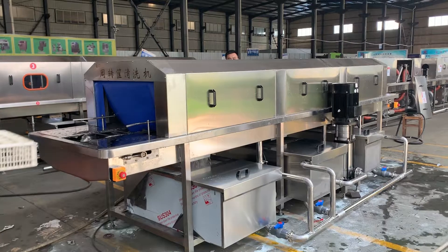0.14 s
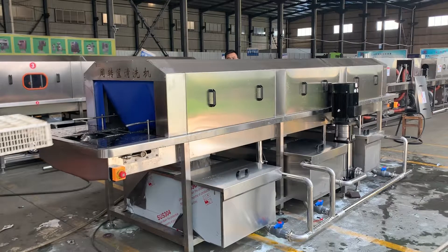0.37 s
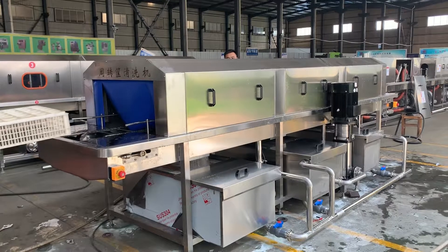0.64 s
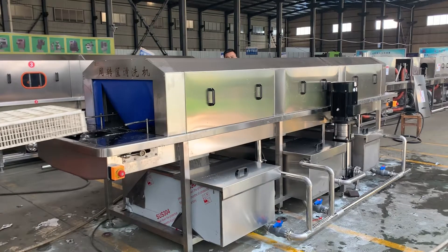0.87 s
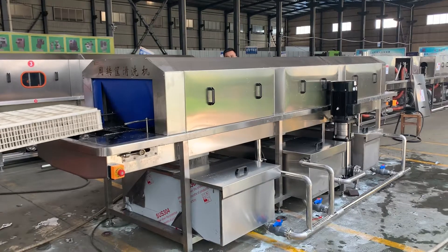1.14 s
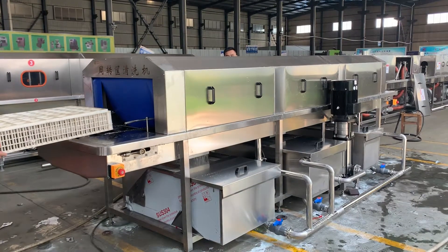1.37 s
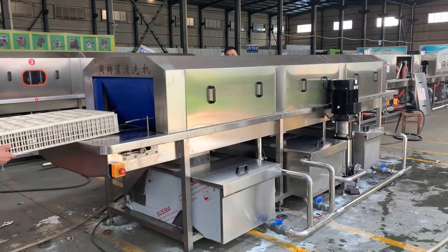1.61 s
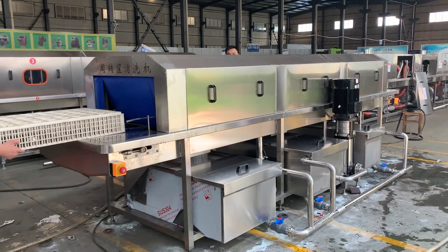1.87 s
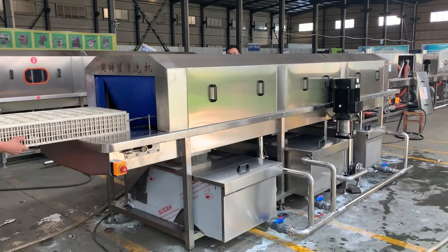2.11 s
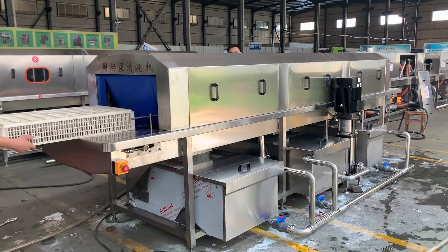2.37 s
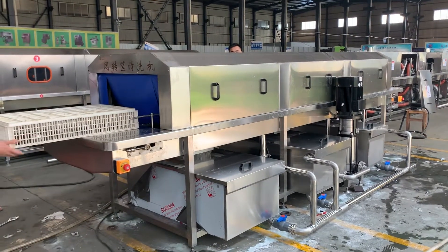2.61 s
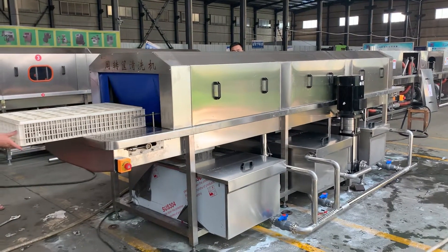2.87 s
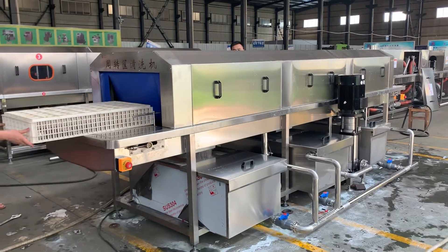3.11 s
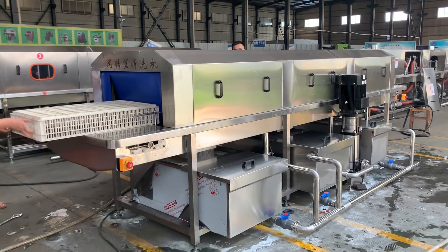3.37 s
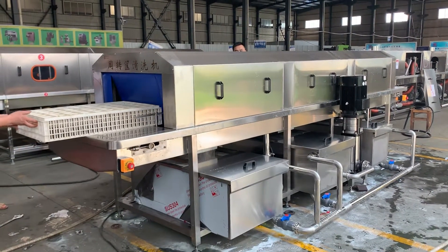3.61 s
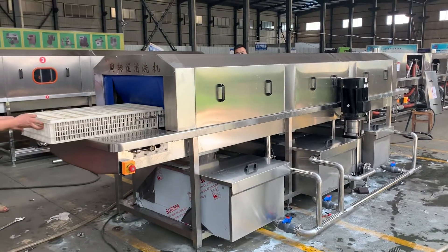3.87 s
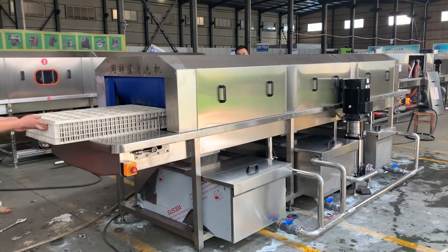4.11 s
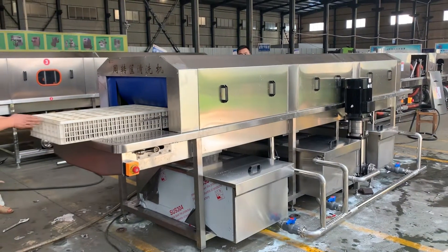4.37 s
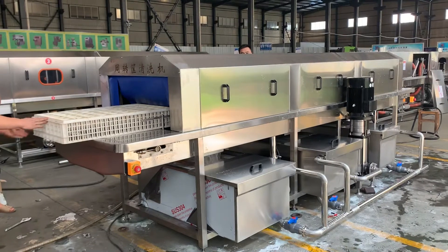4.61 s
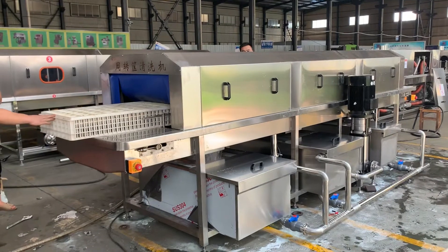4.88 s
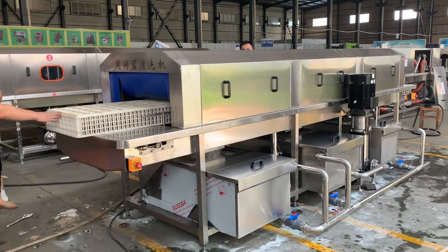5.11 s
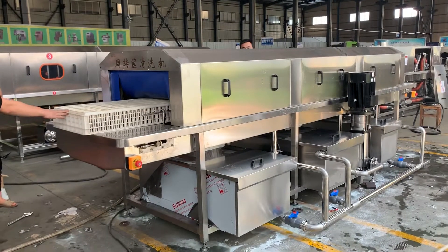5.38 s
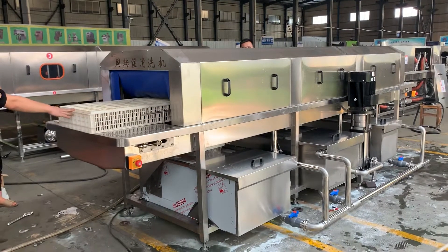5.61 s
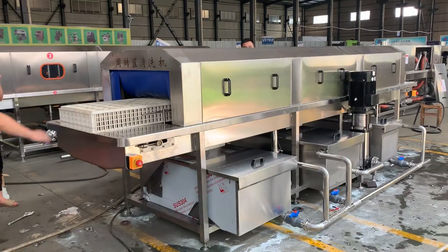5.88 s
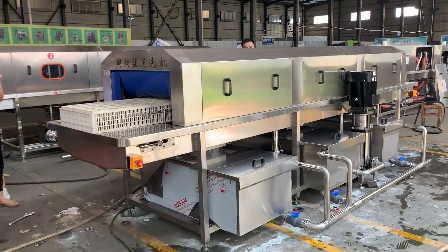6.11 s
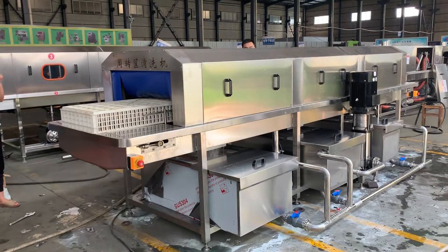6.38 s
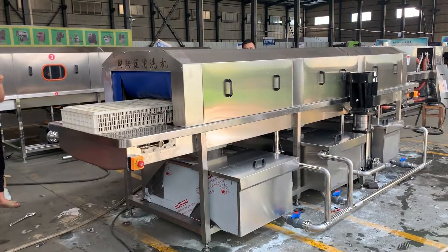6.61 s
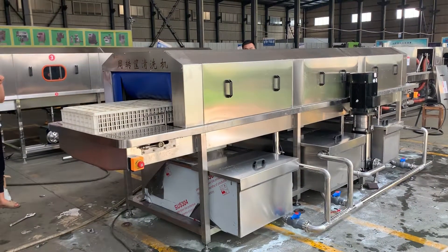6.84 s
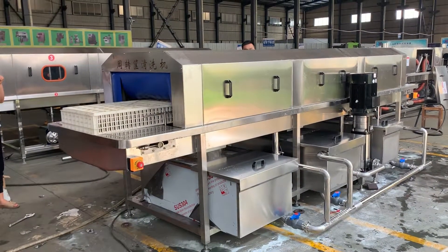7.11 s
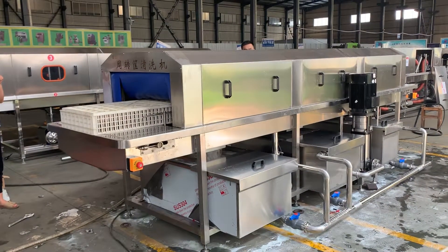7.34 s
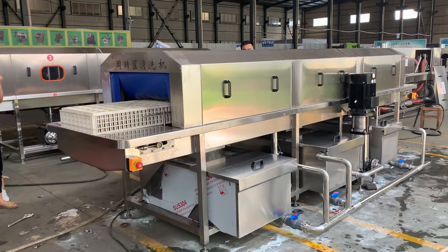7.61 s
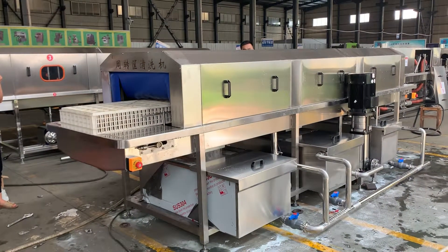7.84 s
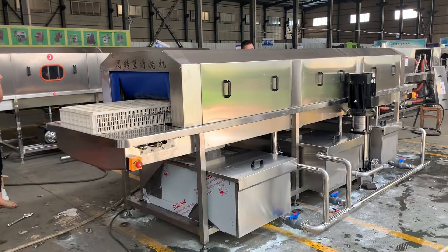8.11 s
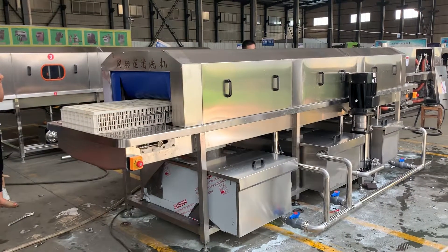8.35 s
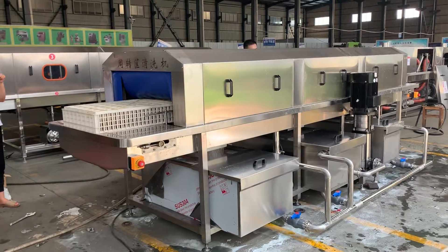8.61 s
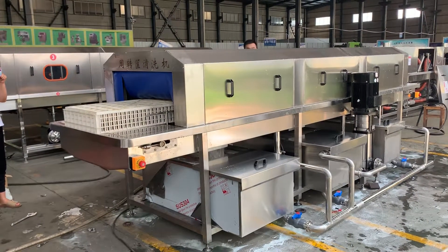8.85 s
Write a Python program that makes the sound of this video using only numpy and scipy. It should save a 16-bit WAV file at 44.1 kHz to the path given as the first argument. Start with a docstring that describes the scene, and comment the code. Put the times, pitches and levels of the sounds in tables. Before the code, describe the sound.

For about nine seconds a large steel washing machine runs continuously in a reverberant factory hall. A low pump hum, one deep tone near 50 Hz and another near 245 Hz, holds steady pitch while its level drifts; the upper tone is strongest around 2.4 s and weaker later. Water jets rush inside as broad midrange noise, with soft surges near 0.8, 2.7, 4.7 and 8.4 s. Panels and lids drone hollowly, the lids swelling slightly, above low hall rumble. Close and dry, slightly right, a bright spray hisses: strong at the start, dropping by 0.35 s, spurting rapidly from 0.9 to 2.6 s, fuller around 3 s, then sputtering irregularly, with noticeable bursts near 4.8, 5.4 and 6.6 s, and rising again towards the end. Stereo microphones a few metres away; nothing stops.

```python
"""In a factory hall a tunnel washer runs. Its pump hums at shaft speed and at the five-vane rate: steady sines
with slowly wavering level and phase. Water jets wash inside and a near spray sputters: shaped noise under
level curves. Steel housing and lids drone as noise in resonant bands, over the low rumble of the hall.
Two microphone ports hear each noise source with its own delay; all but pump and spray reverberate."""
import sys
import numpy as np
from scipy import signal
from scipy.fft import rfft, irfft, next_fast_len
from scipy.io import wavfile
from scipy.ndimage import uniform_filter1d, map_coordinates

SR = 44100
rng = np.random.default_rng(int(sys.argv[2]) if len(sys.argv) > 2 else 0)


def gain_from_db(level_db):
    """Turn a decibel level (scalar or array-like) into a linear amplitude factor."""
    decades = np.asarray(level_db, float) / 20
    return 10 ** decades


def master_out(mix):
    """Clip the mix to full scale and print it as 16-bit PCM to the path in sys.argv[1]."""
    frames = np.transpose(np.atleast_2d(mix))
    ceiling = np.clip(frames, -1, 1)
    pcm = np.round(ceiling * 32767).astype(np.int16)
    wavfile.write(sys.argv[1], SR, pcm)


N = 396018


def unit(x):
    """Normalisation: scales a signal to rms 1."""
    return x / np.sqrt(np.mean(x ** 2) + 1e-20)


def along(points, hz):
    """Logarithmic frequency scale: interpolates (Hz, value) points on a log axis."""
    point_hz, value = np.transpose(points)
    return np.interp(np.log(hz + 1), np.log(point_hz + 1), value)


def curves(rows):
    """Linear interpolation in time: one value per sample for each column after the time."""
    knot_s, *columns = np.transpose(rows)
    return [np.interp(np.arange(N) / SR, knot_s, column) for column in columns]


def wobble(rate):
    """Band-limited fluctuation: a smooth random curve through rate knots a second."""
    knots = rng.standard_normal(int(N * rate / SR) + 4)
    return map_coordinates(knots, [np.arange(N) * rate / SR])


def bumps(rows):
    """Gaussian envelopes: bell-shaped swells in dB; the length is the width at half height."""
    t = np.arange(0, N, 64) / SR
    peak_s, rise_db, length_s = np.transpose(rows)[:, :, None]
    bells = rise_db * np.exp(-np.log(16) * ((t - peak_s) / length_s) ** 2)
    return np.interp(np.arange(N) / SR, t, np.sum(bells, axis=0))


def filtered(x, response):
    """Linear filtering: the spectrum of x times a response of frequency."""
    m = next_fast_len(N + 8192)
    return irfft(rfft(x, m) * response(np.fft.rfftfreq(m, 1 / SR)), m)[..., :N]


def colour(spectrum):
    """Spectral shaping: the gain curve of a (Hz, dB) table."""
    return lambda hz: gain_from_db(along(spectrum, hz))


def panels(modes):
    """Resonance: the gain of noise ringing in a few wide modes whose powers add."""
    def gain(hz):
        power = 0
        for centre, width, db in modes:
            damping = (hz * width) ** 2
            power = power + gain_from_db(db) ** 2 * damping / ((centre ** 2 - hz ** 2) ** 2 + damping)
        return np.sqrt(power)
    return gain


def rush(gain, lag_ms, turn, diffuse, patchy_db):
    """Interaural-type delay and coherence: rms-1 noise, its shared part lag_ms later at the left port."""
    hz, t, z = signal.stft(rng.standard_normal((3, N)), SR, nperseg=512)
    field = uniform_filter1d(rng.standard_normal(z.shape[1:]), 8, 0)
    field = uniform_filter1d(field, 10, 1)  # uneven patches in frequency and time
    # hand-held ports turn a little
    sway_ms = 0.00088 * np.interp(t, np.arange(N) / SR, wobble(5.5))
    # turn: extra phase lag of the left port, in radians
    phase = 2 * np.pi * np.outer(hz, lag_ms + sway_ms) / 1000 + turn
    half = np.exp(-.5j * phase)
    share = np.clip(diffuse, 0, 1)
    pair = np.sqrt(1 - share) * z[0] * [half, half.conj()] + np.sqrt(share) * z[1:]
    noise = signal.istft(pair * gain_from_db(patchy_db * unit(field)), nperseg=512)[1][:, :N]
    return unit(filtered(noise, gain))


SHAFT_HZ, VANE_COUNT = 48.94, 5
# slow drift of the two pump tones: time_s, shaft_level_db, vane_level_db
PUMP_DRIFT = [(0.0, -34.5, -34.5), (0.6, -34.5, -34.5), (0.8, -33, -39), (1.1, -33.5, -34.5),
              (2.4, -33.5, -31), (3.13, -36, -33.5), (3.25, -39, -42), (3.6, -37.5, -40.5),
              (4.0, -37, -38.5), (4.6, -36, -36), (6.0, -34.5, -38.5), (6.4, -34, -41.5), (6.6, -31, -43),
              (7.5, -35, -37), (8.4, -31.5, -39), (8.98, -35, -39.5)]
# weak tones of pump and pipes: pitch_hz, level_db
PIPE_TONES = [(98, -56.5), (294, -59), (592, -61.5), (632, -56.5), (1376, -60)]


def pump():
    """Rotating-machine harmonics: shaft tone, vane tone locked to it, and faint unsteady pipe tones."""
    t = np.arange(N) / SR
    angle = 2 * np.pi * SHAFT_HZ * t
    shaft_db, vane_db = curves(PUMP_DRIFT)
    hum = gain_from_db(shaft_db + .7 * wobble(4.9)) * np.sin(angle + .05 * wobble(3.0))
    hum += gain_from_db(vane_db + 1.9 * wobble(8)) * np.sin(VANE_COUNT * angle + 0.19 * wobble(4))
    for hz, db in PIPE_TONES:
        hum += gain_from_db(db + 3.6 * wobble(3.1)) * np.sin(2 * np.pi * hz * t + 1.15 * wobble(3))
    return np.sqrt(2) * hum  # sine levels become rms levels


# direct spectrum of water jets on steel: freq_hz, density_db (per Hz, relative)
JET_SPECTRUM = [(900, -19.5), (1500, -1.5), (2200, -0.5), (3200, 0), (4200, 0.5), (5500, -7), (6500, -2),
                (7500, -7), (8000, -40)]
# the same jets off the floor: freq_hz, density_db (per Hz, relative)
BOUNCE_SPECTRUM = [(900, -24), (1500, -19), (1900, 5), (2300, -0.5), (3200, 2), (4500, -6), (6500, -9),
                   (7500, -28), (8500, -60)]
# water flow through the jets: time_s, level_db
JET_FLOW = [(0.0, -31.5), (0.6, -35), (1.2, -32.5), (2.0, -33.5), (3.2, -35), (3.7, -33), (4.4, -35.5),
            (5.2, -35.5), (5.8, -33.5), (6.7, -32.5), (7.8, -34), (8.98, -32)]
# surges of the jets: peak_s, rise_db, length_s
JET_SURGES = [(0.786, 5, .06), (1.449, 1, 0.14), (2.716, 4.5, .1), (4.073, 2, .05), (4.652, 4.5, 0.15),
              (4.881, 3, 0.12), (5.774, 2.5, .09), (6.533, 2.5, 0.14), (7.196, 1.5, 0.054), (8.443, 4, .07),
              (8.723, 1.5, .05)]
BOUNCE_DB, BOUNCE_FOLLOWS = -2, 0.92  # floor path re direct; share of the flow's swings it shows
JETS_WAVER_DB = 0.86


def jets():
    """Two-path propagation: the wash reaches the left port first, and much earlier on its floor path."""
    direct = rush(colour(JET_SPECTRUM), lag_ms=-0.17, turn=.01, diffuse=0.28, patchy_db=-0.3)
    bounce = rush(colour(BOUNCE_SPECTRUM), lag_ms=-1.838, turn=.01, diffuse=0.21, patchy_db=1.1)
    flow_db = curves(JET_FLOW)[0] + bumps(JET_SURGES)
    swing_db = flow_db - flow_db.mean()
    direct_db = flow_db + JETS_WAVER_DB * wobble(9)
    floor_db = flow_db.mean() + BOUNCE_DB + BOUNCE_FOLLOWS * swing_db + JETS_WAVER_DB * wobble(9)
    return gain_from_db(direct_db) * direct + gain_from_db(floor_db) * bounce


# sputtering part of the spray hiss: freq_hz, density_db (per Hz, relative)
FIZZ_SPECTRUM = [(2500, -24), (4500, -11), (7000, -7.5), (8500, -4.5), (10000, 1), (12500, -0.5),
                 (15700, 0.5), (17000, -3.5)]
# even part of the spray hiss: freq_hz, density_db (per Hz, relative)
MIST_SPECTRUM = [(4000, -24), (6000, -13.5), (7500, -2), (9500, 0.5), (11500, -5.5), (14000, -27),
                 (17000, -22)]
# spray level between spurts: time_s, level_db
SPRAY_LEVEL = [(0.0, -24), (0.12, -24), (0.35, -31.5), (0.75, -28.5), (1.4, -25), (1.7, -27), (2.45, -31.5),
               (2.9, -25), (3.2, -23.5), (3.85, -28.5), (4.45, -32), (5.35, -31), (6.0, -27.5), (7.0, -30),
               (8.2, -28.5), (8.98, -25)]
# spurts of the spray: peak_s, rise_db, length_s
SPRAY_SPURTS = [(0.925, 4, 0.059), (1.095, 6, .087), (1.21, 5.6, 0.066), (1.334, 3, 0.04),
                (1.439, 4.5, 0.17), (1.793, 7, 0.084), (1.913, 9, 0.056), (2.038, 7, .09), (2.163, 8, 0.11),
                (2.272, 5.5, .07), (2.357, 9.5, 0.047), (2.517, 6.5, 0.13), (2.711, 2, 0.037),
                (2.85, 4.5, .07), (3.056, 4, 0.041), (3.495, 4, 0.13), (3.674, 4.5, .1), (3.998, 7, 0.1),
                (4.243, 5.5, 0.14), (4.412, 4.7, .035), (4.567, 5.5, 0.094), (4.801, 8.4, 0.22),
                (4.936, 4, .08), (5.121, 3.5, .065), (5.405, 9, .04), (5.63, 5, 0.097), (5.779, 5, 0.067),
                (6.034, 3.8, 0.037), (6.218, 3.5, .05), (6.582, 7, 0.17), (6.807, 5, .15),
                (7.191, 4.5, .054), (7.371, 5, 0.12), (7.565, 5.5, .09), (8.039, 4.5, 0.11),
                (8.219, 4, .057), (8.423, 4, 0.23), (8.688, 3, .04), (8.812, 1.5, 0.035),
                (8.95, 1.5, 0.056)]
SPUTTER_DB = 1.13  # small random swings


def spray():
    """Amplitude-modulated noise: near nozzle on the right, fizz driven by pressure and droplets, and mist."""
    pressure_db = curves(SPRAY_LEVEL)[0] + bumps(SPRAY_SPURTS) + SPUTTER_DB * wobble(15)
    drops = unit(gain_from_db(0.87 * wobble(400) + 0.78 * wobble(25)))
    fizz = rush(colour(FIZZ_SPECTRUM), lag_ms=0.2645, turn=-0.4, diffuse=0.0033, patchy_db=1.56)
    mist = rush(colour(MIST_SPECTRUM), lag_ms=0.2668, turn=-0.6, diffuse=0.0055, patchy_db=1.2)
    mist_db = -33 + 0.12 * (pressure_db - pressure_db.mean())
    return gain_from_db(pressure_db) * drops * fizz + gain_from_db(mist_db) * mist


# ringing bands of the steel housing: centre_hz, width_hz, peak_db (relative)
HOUSING_MODES = [(584, 127, 0), (665, 100, 1.5), (782, 130, 3.5)]


def housing():
    """Forced resonance: water drums the steel panels, heard as noise in their ringing bands."""
    return gain_from_db(-37) * rush(panels(HOUSING_MODES), lag_ms=.01, turn=.01, diffuse=0.086, patchy_db=0.9)


# ringing bands of the thinner tank lids: centre_hz, width_hz, peak_db (relative)
LID_MODES = [(1045, 117, 0.5), (1385, 160, 2.5), (1430, 670, -1.5)]
LIDS_DB, LIDS_SWELL_DB_PER_S = -36.5, 0.3033  # level at the start, then rising


def lids():
    """Forced resonance: water drums the thinner lids, which ring higher and slowly swell."""
    level_db = LIDS_DB + LIDS_SWELL_DB_PER_S * np.arange(N) / SR
    return gain_from_db(level_db) * rush(panels(LID_MODES), lag_ms=-0.042, turn=.01, diffuse=0.22, patchy_db=1.36)


# rumble of the hall: freq_hz, density_db (per Hz, relative)
RUMBLE_SPECTRUM = [(15, -22), (25, -7), (40, -6), (65, 1), (88, -4), (140, 0), (190, -4.5), (260, -5),
                   (330, -5), (440, -13), (560, -20), (800, -48)]
RUMBLE_DB, RUMBLE_FADES_DB_PER_S = -36, 0.08  # level at the start, then falling


def rumble():
    """Low-frequency background noise: the nearly coherent rumble of the hall, slowly fading."""
    level_db = RUMBLE_DB - RUMBLE_FADES_DB_PER_S * np.arange(N) / SR
    noise = rush(colour(RUMBLE_SPECTRUM), lag_ms=.01, turn=.01, diffuse=0.053, patchy_db=0.34)
    return gain_from_db(level_db) * noise


def hall(x, count):
    """Reverberation: a dying noise tail ripples steady sound finely; it changes as the listener drifts."""
    t = np.arange(SR // 2) / SR
    wet = np.zeros_like(x)
    position = np.linspace(0, count - 1, N)
    for place in range(count):
        # 60 dB of decay in half a second, after a 4 ms gap
        tail = rng.standard_normal(len(t)) * gain_from_db(-60 * t / .5) * (t > .004)
        tail /= np.linalg.norm(tail)
        near = np.cos(np.pi / 2 * np.clip(position - place, -1, 1))
        wet += near * signal.oaconvolve(x, tail[None], axes=1)[:, :N]
    return x + gain_from_db(-9.5) * wet


def scene():
    """Superposition: all sources add at the two ports; pump and near spray are heard dry."""
    return pump() + hall(jets() + housing() + lids() + rumble(), count=7) + spray()


# left port over right port: freq_hz, difference_db
PORT_BALANCE = [(50, 2.5), (120, -1), (250, 0.5), (700, 0), (1300, 2), (2500, 0), (4000, -1), (5500, -7.5),
                (6800, -.5), (7500, 0)]
TOP_HZ = 15780


def unequal_ports(x):
    """Microphone frequency response: half the difference on each port, with a sharp upper band limit."""
    def response(hz):
        return gain_from_db(np.outer([.5, -.5], along(PORT_BALANCE, hz))) * (hz < TOP_HZ)
    return filtered(x, response)


def band_limit(x):
    """A steep low-pass at the top of the band."""
    return signal.sosfilt(signal.butter(12, 17090, fs=SR, output="sos"), x)


def record(dry):
    """Transduction: the two unequal ports pick up the summed sound."""
    mix = unequal_ports(dry)
    return band_limit(mix)


dry = scene()
out = record(dry)
master_out(out)
```